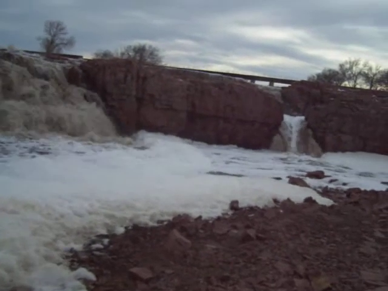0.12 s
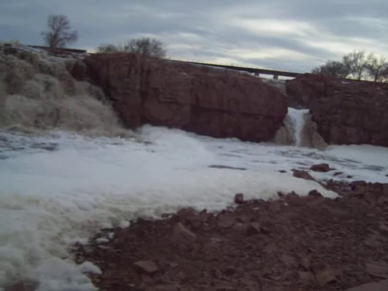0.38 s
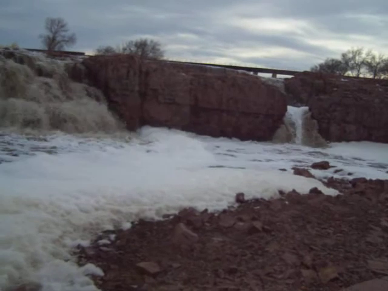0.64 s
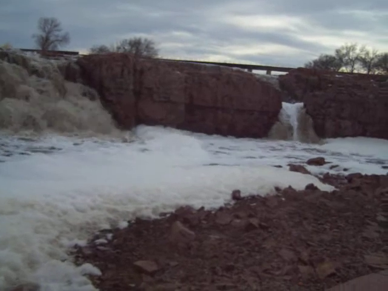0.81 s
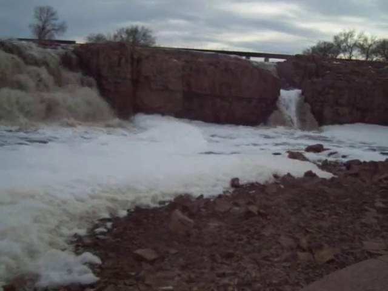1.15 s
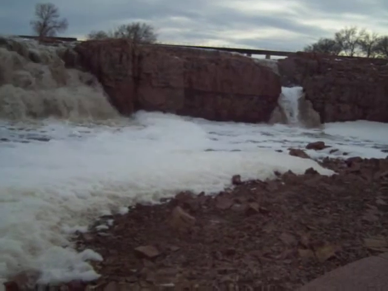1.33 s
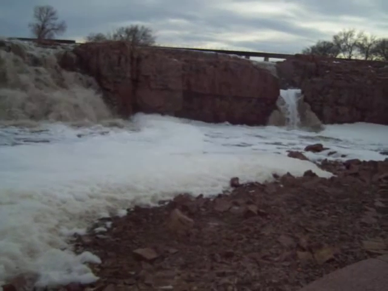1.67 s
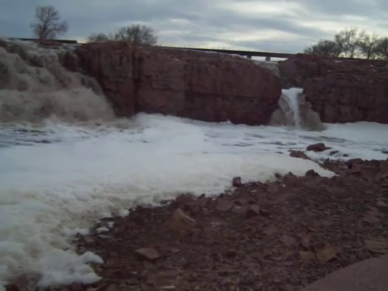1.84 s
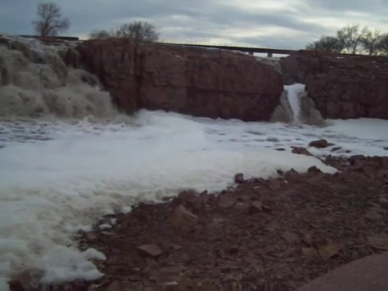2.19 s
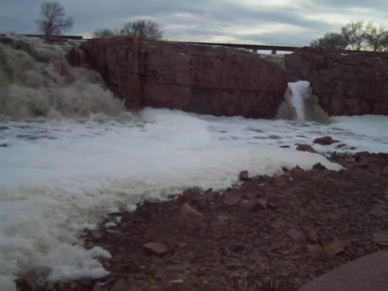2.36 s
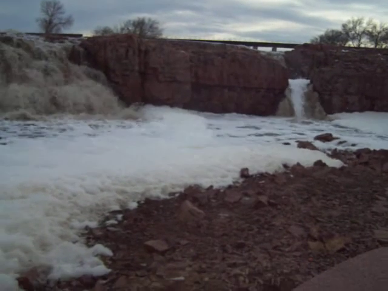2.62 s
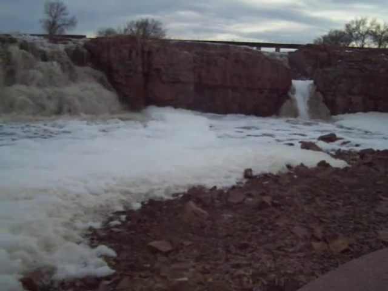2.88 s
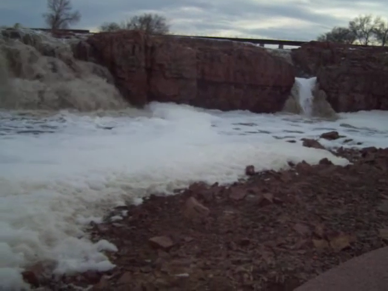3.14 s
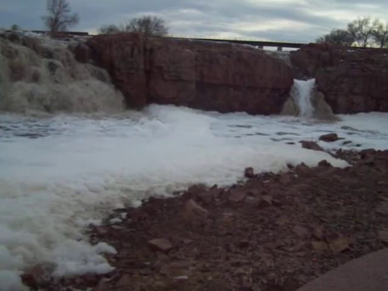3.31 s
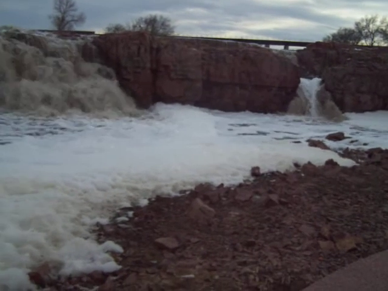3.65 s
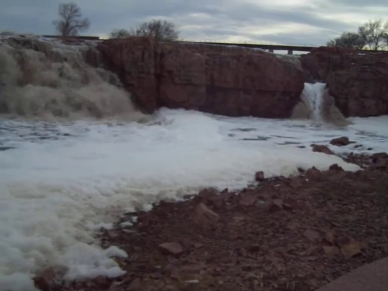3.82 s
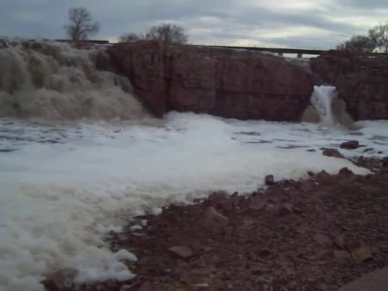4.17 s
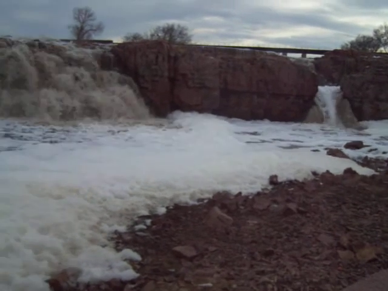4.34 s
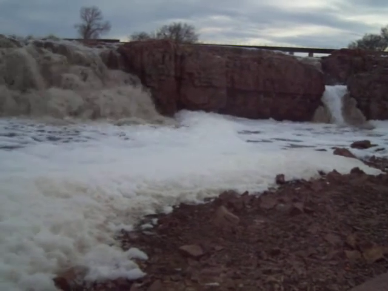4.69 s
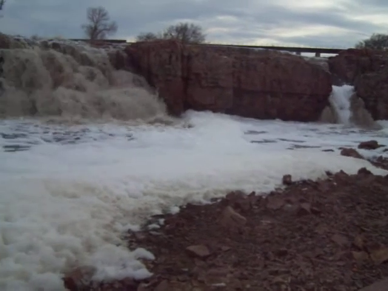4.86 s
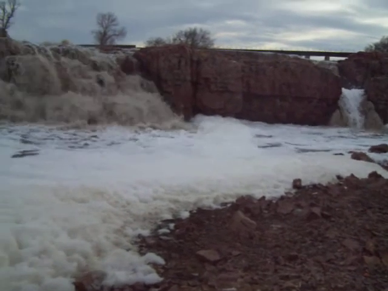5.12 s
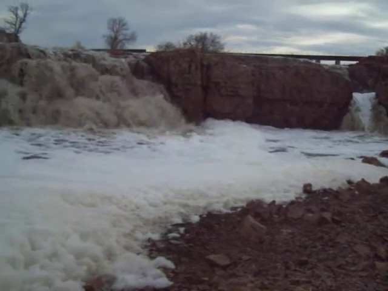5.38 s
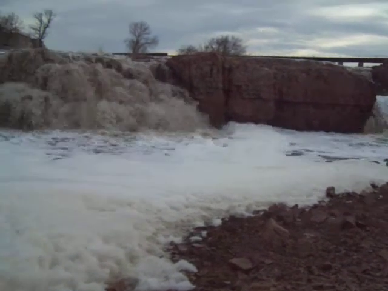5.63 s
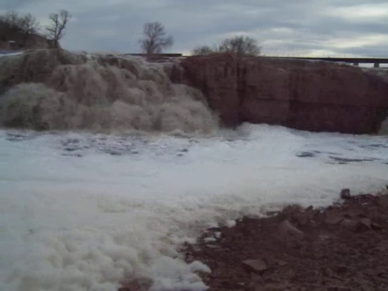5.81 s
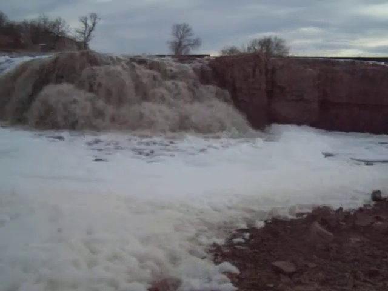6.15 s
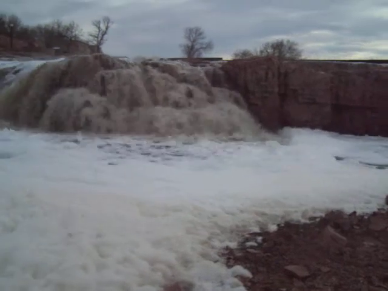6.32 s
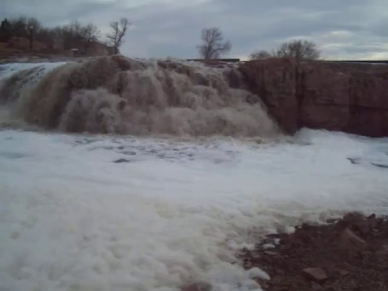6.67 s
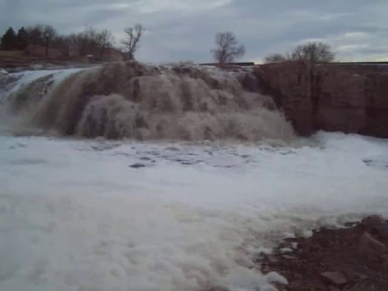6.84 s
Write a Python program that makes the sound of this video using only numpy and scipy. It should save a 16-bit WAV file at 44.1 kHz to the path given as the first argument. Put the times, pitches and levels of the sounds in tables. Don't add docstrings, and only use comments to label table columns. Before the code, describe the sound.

A constant, hissy waterfall rush fills seven seconds; late on, wind buffets the small microphone with increasingly heavy, crowded low thuds.

```python
import sys
import numpy as np
from scipy import signal
from scipy.fft import rfft, irfft, next_fast_len
from scipy.io import wavfile
from scipy.ndimage import uniform_filter1d, map_coordinates

SR = 44100
rng = np.random.default_rng(int(sys.argv[2]) if len(sys.argv) > 2 else 0)


def wrap_up_sound(samples):
    columns = np.atleast_2d(samples).T
    tamed = np.clip(columns, -1, 1)
    steps = np.round(tamed * 32767).astype(np.int16)
    wavfile.write(sys.argv[1], SR, steps)


def rack_gain(trim_db):
    fader = np.asarray(trim_db, float)
    return 10 ** (fader / 20)


N = 308259

# t/s, level/dB, heavy water over spray/dB
FLOW = [(0, -19, -0.2), (.3, -19, .2), (.55, -20, -0.2), (1, -18.5, 0.5), (1.25, -19.7, -0.5),
        (1.6, -19.4, 0.2), (2.1, -19.5, .5), (2.6, -20, -.2), (3, -19.3, -0.5), (3.5, -19, -0.2),
        (4.2, -19, -1.55), (4.75, -19.5, 1.15), (5.25, -19.5, -.5), (5.5, -20, 1.3), (6, -19.6, -0.5),
        (6.25, -21, 1.1), (6.5, -19.5, 0), (6.99, -21.5, 1)]
# f/Hz, density/dB
PLUNGE_SPECTRUM = [(30, -27), (90, -7.5), (140, -3), (190, 0), (300, -.5), (410, -6), (500, -1), (600, 1),
                   (720, -2), (860, -3.5), (1060, -3), (1300, -5), (1600, -26), (3000, -120)]
# f/Hz, density/dB
CHURN_SPECTRUM = [(700, -64), (1150, -16.5), (1400, -2.5), (1650, -0.5), (1850, -1), (2060, -3.5),
                  (2400, -3), (3000, -24), (5500, -120)]
# f/Hz, density/dB
SPRAY_SPECTRUM = [(1300, -60.5), (2000, -15.5), (2400, -7.5), (2800, -4), (3200, -1), (3550, 0.5),
                  (3900, -1.5), (4300, -4), (4750, -9.5), (5600, -29.5), (9000, -120)]
# f/Hz, density/dB
MIST_SPECTRUM = [(2700, -58), (4300, -10.5), (4800, -2.5), (5050, -1), (5500, -3), (6200, -6),
                 (7000, -10.5), (7400, -13.5), (7700, -18), (8050, -25), (12000, -120)]
# t/s, rumble level/dB
BREEZE = [
    (0, -39.5),
    (3.9, -38.5),
    (4.5, -36.5),
    (5.4, -36.5),
    (5.7, -32.5),
    (6.35, -31.5),
    (6.5, -31),
    (6.99, -29.5),
]
# t/s, level change/dB, half-length/s
GUSTS = [(0.153, 3.5, .1), (.75, 1.5, .08), (1.306, 3.5, 0.061), (1.495, 3.5, .06), (1.84, 7.5, 0.088),
         (2.017, -3.5, .05), (2.436, 3.5, 0.076), (2.862, 3.5, .09), (3.334, 3.5, .09), (3.49, -3.5, .05),
         (3.798, 2.5, .07), (4.202, 2.5, .12), (4.967, 2.5, .12), (5.187, 8, .06), (5.398, -3.5, .06),
         (5.61, 6, 0.059), (5.919, 4.5, .06), (6.261, 2.5, .05), (6.618, 2.5, 0.084), (6.881, 4.5, 0.079)]
# t/s, peak level/dB, f/Hz
STRONG_EDDIES = [(4.842, -12.5, 154), (5.029, -18.5, 136), (5.627, -14, 142), (5.895, -13.5, 150),
                 (5.912, -13, 140), (5.935, -15, 150), (5.956, -16, 110), (6.056, -11.5, 195),
                 (6.132, -12, 220), (6.243, -11.5, 133), (6.274, -11.5, 150), (6.288, -12, 182),
                 (6.411, -9.5, 148), (6.45, -9.5, 240), (6.512, -10.5, 304), (6.524, -10, 224),
                 (6.606, -7.5, 280), (6.622, -12, 232), (6.639, -8.5, 270), (6.673, -9.5, 195),
                 (6.693, -16, 122), (6.802, -14.5, 186), (6.816, -13, 137), (6.842, -10.5, 181),
                 (6.863, -11.5, 217), (6.871, -13.5, 127), (6.892, -12, 160), (6.914, -12, 229),
                 (6.942, -10, 196), (6.958, -15, 200)]
# f/Hz, density/dB
SLOW_EDDY_SPECTRUM = [(8, -21.5), (20, -8), (35, -4.5), (62, -0.5), (90, -6.5), (130, -8), (200, -14.5),
                      (350, -17.5), (700, -36.5), (1500, -68.5)]
# f/Hz, density/dB
FAST_EDDY_SPECTRUM = [(40, -30), (100, -1), (160, 1), (280, -4.5), (450, -9.5), (800, -30), (1600, -81)]
# f/Hz, level/dB
IMAGE_LEAK = [(8000, 1.5), (8400, -12.5), (8700, -22.5), (9000, -36.5), (9200, -51), (9300, -70.5),
              (9500, -120)]

PLUNGE_DB, CHURN_DB, SPRAY_DB, MIST_DB = -10, -10, -1.24, -9
PLUNGE_FOLLOWS, CHURN_FOLLOWS, MIST_FOLLOWS = 0.52, 0.9, 0.7
SMALL_PER_S, SMALL_GROWS = 34, 3.2
SMALL_DB, SMALL_HZ = -22, 210
EDDY_CYCLES, EDDY_PEAKY = 0.34, 1.6
SAMPLING_HZ = 16000


def falls():
    flow_db, heavy_db = curves(FLOW)
    mean_db = flow_db.mean()
    swing_db = flow_db - mean_db
    surge = wobble(9)

    plunge_db = PLUNGE_DB + heavy_db + PLUNGE_FOLLOWS * swing_db + 0.25 * wobble(6) + 0.13 * surge
    plunge = rack_gain(plunge_db) * rush(PLUNGE_SPECTRUM, patchy_db=0.22)

    churn_db = CHURN_DB + 1.1 * heavy_db + CHURN_FOLLOWS * swing_db + 0.16 * surge
    churn = rack_gain(churn_db) * rush(CHURN_SPECTRUM, patchy_db=0.37)

    spray_db = SPRAY_DB + swing_db + 0.17 * surge + 0.44 * wobble(40)
    spray = rack_gain(spray_db) * rush(SPRAY_SPECTRUM, patchy_db=0.18)

    mist_db = MIST_DB + MIST_FOLLOWS * swing_db + 0.17 * surge
    mist = rack_gain(mist_db) * rush(MIST_SPECTRUM, patchy_db=0.74)
    return rack_gain(mean_db) * (plunge + churn + spray + mist)


def wind():
    rumble_db = breeze()
    return rumble(rumble_db) + thumps(rumble_db)


def rumble(rumble_db):
    lumps = rack_gain(wobble(35))
    slow = rack_gain(rumble_db + 0.35) * coloured(lumps * rng.standard_normal(N), SLOW_EDDY_SPECTRUM)
    gusty = rack_gain(2.9 * wobble(45))
    fast_db = 1.8 * (rumble_db + 30.0) - 39.5
    fast = rack_gain(fast_db) * coloured(gusty * rng.standard_normal(N), FAST_EDDY_SPECTRUM)
    return slow + fast


def thumps(rumble_db):
    out = np.zeros(N + SR)
    reach = SR // 40
    t = np.arange(-reach, reach) / SR
    leans = rng.random(300)
    eddies = list(STRONG_EDDIES) + small_eddies(rumble_db)
    for (s, db, hz), lean in zip(eddies, leans):
        swell = np.exp(-np.abs(t * hz / EDDY_CYCLES) ** EDDY_PEAKY)
        push = swell * np.cos(2 * np.pi * (hz * t + 0.15 * lean))
        leaked = 0.33 * swell * push.sum() / swell.sum()
        start = round(s * SR) - reach
        out[start:start + len(t)] += rack_gain(db - 2.0) * (push - leaked)
    return out[:N]


def small_eddies(rumble_db):
    rate = SMALL_PER_S * rack_gain(SMALL_GROWS * (rumble_db + 29.5))
    passed = np.cumsum(rate) / SR
    chance = rng.standard_normal((200, 3))
    marks = np.cumsum(np.abs(chance[:, 0]) * 1.25)
    s = np.interp(marks, passed, np.arange(N) / SR)
    peak_db = SMALL_DB + 2.2 * chance[:, 1]
    hz = SMALL_HZ * np.exp(0.25 * chance[:, 2])
    rows = np.c_[s, peak_db, hz]
    inside = (marks < passed[-1]) & (s > 0.05)
    return [tuple(r) for r in rows[inside]]


def breeze():
    t = np.arange(N) / SR
    gusts_db = sum(db * np.exp(-((t - s) / half) ** 2) for s, db, half in GUSTS)
    return curves(BREEZE)[0] + gusts_db


def rush(spectrum, patchy_db):
    z = signal.stft(rng.standard_normal(N), nperseg=512)[2]
    field = uniform_filter1d(rng.standard_normal(z.shape), size=8, axis=0)
    field = uniform_filter1d(field, size=12, axis=1)
    patchy = signal.istft(z * rack_gain(patchy_db * unit(field)), nperseg=512)[1][:N]
    return coloured(patchy, spectrum)


def coloured(x, spectrum):
    m = next_fast_len(N + 8192)
    f, db = np.transpose(spectrum)
    log_hz = np.log(np.fft.rfftfreq(m, 1 / SR) + 1)
    gain = rack_gain(np.interp(log_hz, np.log(f + 1), db))
    return unit(irfft(rfft(x, m) * gain, m)[:N])


def wobble(rate):
    knots = rng.standard_normal(int(N * rate / SR) + 4)
    return map_coordinates(knots, [np.arange(N) * rate / SR])


def curves(rows):
    s, *cols = np.transpose(rows)
    return [np.interp(np.arange(N) / SR, s, c) for c in cols]


def unit(x):
    return x / np.sqrt(np.mean(x ** 2) + 1e-20)


def scene():
    return (falls() + wind())[None]


def band_limit(x):
    return signal.sosfilt(signal.butter(12, 9260, fs=SR, output="sos"), x)


def record(dry):
    saturated = dry / (1 + np.abs(dry / 0.9) ** 4.5) ** (1 / 4.5)
    hz = np.fft.rfftfreq(N, 1 / SR)
    kept = irfft(rfft(saturated) * (hz < SAMPLING_HZ / 2), N)
    mirrored = 2 * kept * np.cos(2 * np.pi * SAMPLING_HZ * np.arange(N) / SR)
    leak = rack_gain(np.interp(hz, *np.transpose(IMAGE_LEAK))) * (hz >= SAMPLING_HZ / 2)
    image = irfft(rfft(mirrored) * leak, N)
    return band_limit(kept + image)


dry = scene()
out = record(dry)
wrap_up_sound(out)
```